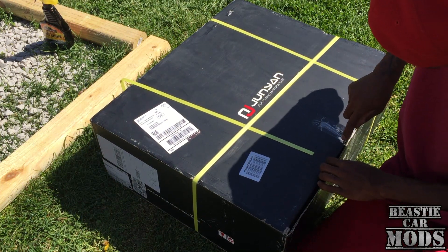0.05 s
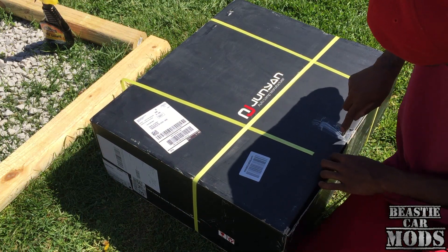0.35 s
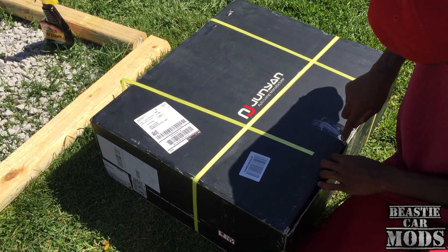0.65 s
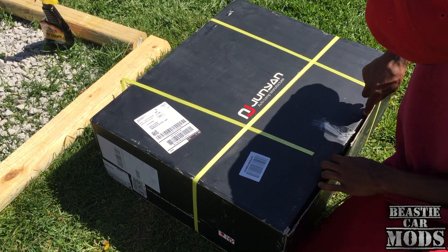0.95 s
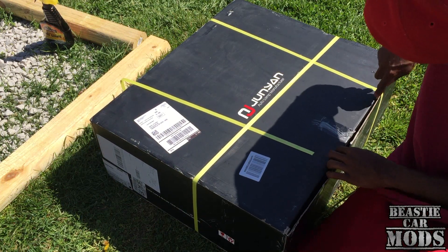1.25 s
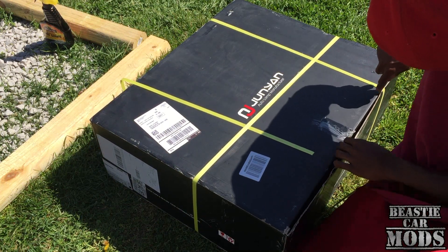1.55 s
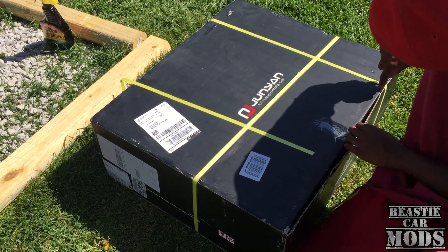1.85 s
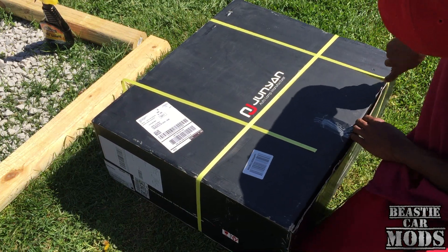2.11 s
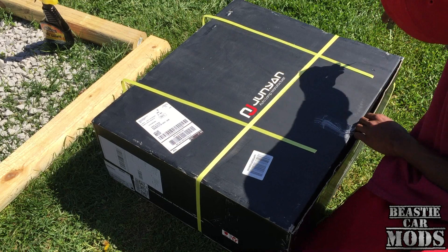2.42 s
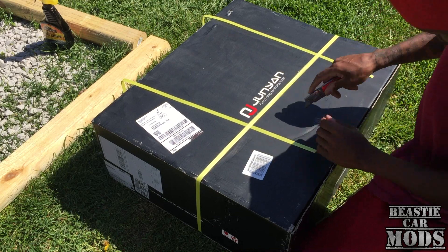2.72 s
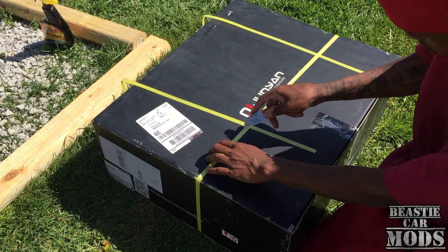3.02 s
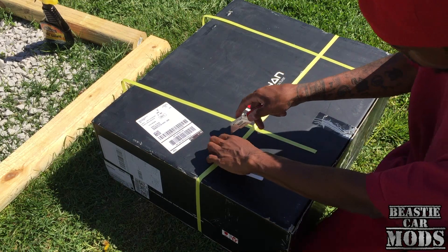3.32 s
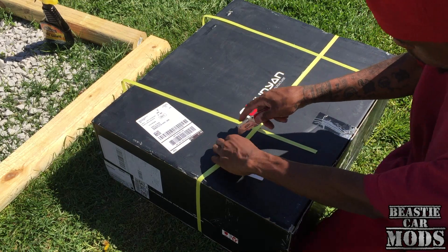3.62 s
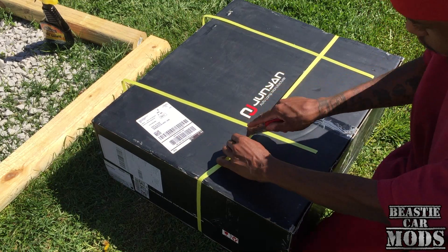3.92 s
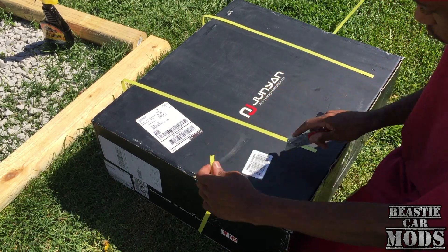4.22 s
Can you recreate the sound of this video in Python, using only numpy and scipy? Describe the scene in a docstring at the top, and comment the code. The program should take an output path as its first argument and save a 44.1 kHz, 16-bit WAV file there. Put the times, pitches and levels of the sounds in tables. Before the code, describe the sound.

Outdoors, a hand cutter scrapes and clicks lightly against a large cardboard box close to the microphone. A taut plastic strap cracks apart, thumps the hollow lid and slithers off, and a second follows about a second later. The steel jaws then tick shut with another crack, and a last strap snaps at the end. Light wind rumbles on the microphone while small birds whistle faintly over a distant rush.

```python
"""Taut plastic packing straps are cut off a big cardboard box on a lawn.
Light wind buffets the microphone over a far outdoor rush; small birds whistle and twitter throughout.
The cutter scrapes and clicks. Near 1.1 s and 2.3 s a strap cracks apart, thumps the hollow box,
then slithers and slaps over the lid. At 3.5 s the steel jaws tick shut with another crack.
The last strap gives way at 4.2 s."""
import sys
import numpy as np
from scipy import signal
from scipy.fft import rfft, irfft, next_fast_len
from scipy.io import wavfile
from scipy.ndimage import uniform_filter1d, map_coordinates

SR = 44100
rng = np.random.default_rng(int(sys.argv[2]) if len(sys.argv) > 2 else 0)


def transcribe(u):
    """Save the signal u as a 16-bit wav file named by the first command-line argument.

    u: samples, shape (n,) or (channels, n), limited to [-1, 1]; the rate is SR.
    q: integer samples, one column per channel.
    """
    v = np.clip(np.atleast_2d(u).T, -1, 1)
    q = np.round(v * 32767).astype(np.int16)
    wavfile.write(sys.argv[1], SR, q)


N = 187769
TIME = np.arange(N) / SR
HALF_SECOND = TIME[:SR // 2]


def amp(db):
    """Decibels to gain."""
    return 10 ** (np.asarray(db) / 20)


def unit(x):
    """x at rms 1."""
    return x / np.sqrt(np.mean(x ** 2) + 1e-20)


def burst(x):
    """x with the energy of 3 ms at rms 1."""
    return x * np.sqrt(.003 * SR / (np.sum(x ** 2) + 1e-20))


def fade(t, t60_s):
    """Exponential decay from t = 0."""
    return np.exp(-np.log(1000) * np.maximum(t, 0) / t60_s)


def at_hz(rows, hz):
    """Interpolate (Hz, value) rows on a log axis."""
    knots_hz, values = np.transpose(rows)
    return np.interp(np.log(hz + 1), np.log(knots_hz), values)


def curve(rows):
    """One value per sample from (s, value) rows."""
    return np.interp(TIME, *np.transpose(rows))


def wobble(rate_hz, size=N):
    """Smooth random curve, rate_hz knots a second."""
    knots = rng.standard_normal(int(size * rate_hz / SR) + 4)
    return map_coordinates(knots, [np.arange(size) * rate_hz / SR])


def add(track, start_s, x):
    """Mix x into the track."""
    start = max(round(start_s * SR), 0)
    track[start:start + len(x)] += x[:max(len(track) - start, 0)]


def coloured(x, spectrum):
    """x through a minimum-phase filter given as (Hz, dB) rows."""
    size = 2 * next_fast_len(len(x))
    gain = amp(at_hz(spectrum, np.fft.rfftfreq(size, 1 / SR)))
    cepstrum = irfft(np.log(gain))
    cepstrum[1:size // 2] *= 2
    cepstrum[size // 2 + 1:] = 0
    return irfft(rfft(x, size) * np.exp(rfft(cepstrum)))[:len(x)]


def low_cut(x, corner_hz):
    """Second-order high-pass."""
    return signal.sosfilt(signal.butter(2, corner_hz, "highpass", fs=SR, output="sos"), x)


# Each row: time in seconds, relative level in dB.
WIND_LEVELS = [(0, -57), (.3, -41.5), (.55, -47.5), (.73, -45.5), (1.05, -55.5), (1.4, -42), (1.63, -46.5),
               (1.8, -40), (1.85, -32), (1.91, -45), (2.04, -39.5), (2.25, -45), (2.85, -52.5),
               (3.55, -46.5), (3.9, -56), (4.25, -46)]
# Each row: frequency in Hz, relative level in dB.
WIND_SPECTRUM = [(18, -32), (30, -29), (42, 1), (60, -0.5), (80, 3), (120, -5.5), (165, -13.5),
                 (300, -33.5), (600, -72), (1500, -120)]

def wind(gain_db=1):
    """Light wind buffets the microphone with a low rumble."""
    rumble = unit(coloured(rng.standard_normal(N), WIND_SPECTRUM))
    return rumble * amp(curve(WIND_LEVELS) + gain_db)


# Each row: time in seconds, relative level in dB.
RUSH_LEVELS = [(0, -51.5), (.6, -53), (.8, -56.5), (2.3, -58.5), (2.7, -60.5), (4.25, -58)]
# Each row: frequency in Hz, relative level in dB.
RUSH_SPECTRUM = [(60, -23), (130, -5), (250, -4.5), (450, -11.5), (620, -11.5), (780, -8.5), (950, -8),
                 (1150, -13.5), (1500, -12), (2000, -17.5), (2800, -20.5), (4000, -27.5), (7000, -56)]

def far_rush(gain_db=2, patch_db=4):
    """Distant outdoor noise, drifting in patches of time and frequency."""
    bins = signal.stft(rng.standard_normal(N), nperseg=1024)[2]
    patches = uniform_filter1d(rng.standard_normal(bins.shape), size=4, axis=0)
    patches = uniform_filter1d(patches, size=7, axis=1)
    noise = signal.istft(bins * amp(patch_db * unit(patches)), nperseg=1024)[1][:N]
    return unit(coloured(noise, RUSH_SPECTRUM)) * amp(curve(RUSH_LEVELS) + gain_db)


# Each row: peak time in seconds, width in seconds, level in dB.
DRONE_SWELLS = [(.4, 1, -58.5), (2.6, 0.039, -59), (3.08, 0.069, -55)]

def far_drone(centre_hz=950, width_hz=90):
    """A hollow tone of narrow-band noise swells out of the rush."""
    phase = 2 * np.pi * centre_hz * TIME
    band = wobble(2 * width_hz) * np.sin(phase) + wobble(2 * width_hz) * np.cos(phase)
    swells = sum(amp(db) * np.exp(-((TIME - peak_s) / width_s) ** 2)
                 for peak_s, width_s, db in DRONE_SWELLS)
    return unit(band) * swells


# Each row: frequency in Hz, relative level in dB.
HISS_SPECTRUM = [(300, -21), (3000, 1), (6000, -3), (9000, -6.5), (10300, -10.5), (12000, -9),
                 (16000, -12.5)]

def hiss(level_db=-73):
    """Faint, steady hiss."""
    return amp(level_db) * unit(coloured(rng.standard_normal(N), HISS_SPECTRUM))


def bird_note(length_s, end_hz, fall_hz, shake_hz, shake_rate_hz):
    """A shaking tone that slides by fall_hz and levels out."""
    size = int(length_s * SR)
    slide_hz = fall_hz * np.linspace(1, 0, size) ** 2.1
    pitch_hz = end_hz + slide_hz + shake_hz * wobble(shake_rate_hz, size)
    return signal.windows.tukey(size, .5) * np.sin(2 * np.pi * np.cumsum(pitch_hz) / SR)


# Each row: start in seconds, length in seconds, end pitch in Hz, fall to it in Hz, level in dB.
WHISTLE_NOTES = [(0, 0.039, 2850, 754, -45.5), (0.044, 0.038, 2853, 208, -51.5),
                 (0.485, .099, 2430, 440, -58), (1.336, .084, 2970, 71, -57),
                 (2.184, 0.0415, 2990, 248, -59), (2.242, 0.034, 2750, 326, -56.5),
                 (2.81, 0.056, 2800, 343, -60.5), (2.963, 0.0383, 2740, 330, -61.5),
                 (3.817, 0.096, 2588, -53, -62), (3.979, .035, 2927, 322, -55)]

def whistles():
    """One bird whistles short, mostly falling notes."""
    out = np.zeros(N)
    for start_s, length_s, end_hz, fall_hz, db in WHISTLE_NOTES:
        note = bird_note(length_s, end_hz, fall_hz, shake_hz=45.5, shake_rate_hz=600)
        add(out, start_s, amp(db) * note)
    return out


# Each row: resonance in Hz, bandwidth in Hz, gain in dB.
PANEL_MODES = [(268, 54, -4), (368, 61, 6), (539.5, 36, -3), (654, 68, 3.5), (888, 285, 0.5),
               (1383, 105, -7.5), (1544, 71, 1.5), (1767, 184, 3.5), (2085, 50, 1.5), (2462, 114, -0.5)]

def cardboard(force, pitch_ratio=1, corner_hz=2400):
    """Yielding panels take in little treble and ring at a pitch set by where they are struck."""
    push = signal.sosfilt(signal.butter(2, corner_hz, fs=SR, output="sos"), force)
    size = 2 * next_fast_len(len(force))
    hz = np.fft.rfftfreq(size, 1 / SR) / pitch_ratio
    response = sum(amp(db) * 1j * hz * width_hz / (mode_hz ** 2 - hz ** 2 + 1j * hz * width_hz)
                   for mode_hz, width_hz, db in PANEL_MODES)
    return irfft(rfft(push, size) * response)[:len(force)]


# The strap's rasp and sharp edge. Each row: frequency in Hz, relative level in dB.
RASP_SPECTRUM = [(300, -16), (1200, -4), (2200, 1.5), (3200, 4.5), (4500, -3), (5600, -14.5), (7500, -14.5),
                 (12000, -40)]
EDGE_SPECTRUM = [(3000, -36.5), (6000, 6.5), (8500, 2.5), (10300, -8), (11800, -8), (16000, -21.5)]

def friction(strokes, grain_db=3, grain_rate_hz=900, clump_db=2.8, clump_rate_hz=110):
    """Embossed plastic catches and slips on cardboard in clumps of tiny grains."""
    powers = np.zeros((3, N))
    for peak_s, rise_s, t60_s, *levels_db in strokes:
        start_s = max(peak_s - .15, 0)
        t = HALF_SECOND + start_s - peak_s
        envelope = np.exp(np.minimum(t, 0) * 2 / rise_s) * fade(t, t60_s)
        for power, db in zip(powers, levels_db):
            add(power, start_s, (amp(db) * envelope) ** 2)
    rasp_gain, edge_gain, board_gain = np.sqrt(powers)
    slips = rng.standard_normal(N)
    slips *= amp(grain_db * wobble(grain_rate_hz) + clump_db * wobble(clump_rate_hz))
    rasp = rasp_gain * unit(coloured(slips, RASP_SPECTRUM))
    edge = edge_gain * unit(coloured(slips, EDGE_SPECTRUM))
    return rasp + edge + board_gain * unit(cardboard(slips))


# Each row: peak time, rise and t60 in seconds, then rasp, edge and cardboard levels in dB.
SCRAPE_STROKES = [(.096, 0.0044, 0.082, -37.5, -54.5, -46), (.833, 0.01, 0.071, -50.5, -72, -56),
                  (1.166, .045, 0.17, -40.5, -61, -41), (1.244, 0.13, 0.66, -54, -74, -59.5),
                  (1.604, 0.027, .12, -41.5, -62.5, -51), (1.785, 0.11, 0.56, -55.5, -70, -70),
                  (1.925, .04, .1, -45, -69, -54), (2.038, .062, 0.23, -50, -70, -50.5),
                  (2.178, 0.059, 0.5, -48.5, -78, -49.5), (2.412, 0.0077, .035, -37, -60, -43),
                  (2.49, 0.1, .36, -56.5, -70, -67), (2.78, 0.078, 0.16, -49.5, -63.5, -56.5),
                  (3.262, 0.019, 0.083, -41.5, -70, -37), (3.28, .13, 0.34, -46.5, -67, -50.5),
                  (3.52, 0.077, 0.65, -48, -66, -53.5), (3.565, 0.015, .048, -40, -72, -39),
                  (3.836, 0.014, 0.13, -56, -69, -54), (4.079, 0.01, .093, -43, -52, -47.5),
                  (4.255, 0.028, .1, -38.5, -49, -44)]

def scrapes():
    """Blade, hand and plastic rub over the box."""
    return friction(SCRAPE_STROKES)


def fracture(t60_s, clean_t60_s=0.015, flutter_db=-12, flutter_t60_s=0.035):
    """Force of a snap: sharp release, splintering fibres (longer is more ragged), strap flutter."""
    t = TIME[:SR // 12]
    splinters = burst(rng.standard_normal(len(t)) * fade(t, t60_s))
    release = burst(1. * (t == 0)) * clean_t60_s / t60_s
    flutter = burst(rng.standard_normal(len(t)) * fade(t, flutter_t60_s))
    return burst(release + splinters) + amp(flutter_db) * flutter


# Each row: frequency in Hz, relative level in dB.
CRACK_SPECTRUM = [(300, -64), (1000, -7), (1650, -15.5), (1950, -12), (2300, -6.5), (2900, 1.5),
                  (3600, -2.5), (4500, -6), (5400, -18), (6300, -15.5), (7500, -19), (12000, -44)]

def snap(crack_db, t60_s, edge_db, knock_db, pitch_ratio, low_cut_hz):
    """Plastic cracks and knocks on the cardboard, with less bass where the lid is held stiff."""
    force = fracture(t60_s)
    crack = amp(crack_db) * burst(coloured(force, CRACK_SPECTRUM))
    edge = amp(edge_db) * burst(coloured(force, EDGE_SPECTRUM))
    knock = amp(knock_db) * burst(cardboard(low_cut(force, low_cut_hz), pitch_ratio))
    return crack + edge + knock


def tap(click_db, knock_db, t60_s):
    """A light touch on strap and box makes a small snap."""
    edge_db = click_db - 19.5
    return snap(click_db, t60_s, edge_db, knock_db, pitch_ratio=.84, low_cut_hz=150)


# Each row: start in seconds, click level in dB, cardboard knock level in dB.
CUTTER_CLICKS = [(0.4926, -37, -40), (0.8842, -49.5, -64), (2.0985, -49, -64), (2.7955, -43, -56),
                 (3.5595, -45, -49), (3.667, -41, -38.5), (3.6847, -35, -32.5), (4.034, -46.5, -57),
                 (4.052, -44, -54), (4.161, -43, -61)]

def cutter_clicks():
    """The cutter bumps against strap and box."""
    out = np.zeros(N)
    for start_s, click_db, knock_db in CUTTER_CLICKS:
        add(out, start_s, tap(click_db, knock_db, t60_s=0.0091))
    return out


# Each row: start in seconds, length in seconds, pitch in Hz, level in dB.
TWITTER_NOTES = [(0.589, 0.061, 4670, -58.5), (0.755, .11, 3600, -59), (1.503, 0.084, 4170, -58),
                 (1.642, 0.17, 3930, -57.5), (2.003, .14, 3640, -54.5), (2.216, .05, 3550, -57),
                 (2.513, 0.062, 3515, -58), (2.647, 0.15, 3940, -60), (3.863, 0.093, 4400, -57)]

def twitters():
    """A second bird sings higher, its widely shaking pitch making a buzz."""
    out = np.zeros(N)
    for start_s, length_s, hz, db in TWITTER_NOTES:
        note = bird_note(length_s, hz, fall_hz=0, shake_hz=373, shake_rate_hz=350)
        add(out, start_s, amp(db) * note)
    return out


# Each row: start in seconds, crack level in dB, t60 in seconds, edge level in dB,
# knock level in dB, panel pitch ratio, knock low cut in Hz.
STRAP_CRACKS = [(1.0487, -15.5, 0.0022, -27.5, -27, 1, 500), (1.0501, -21.5, 0.0063, -45, -25, 0.62, 348),
                (1.0696, -28, .005, -50, -48, 1, 200), (1.078, -16.5, 0.0055, -36.5, -23, .75, 120),
                (2.3368, -12.5, 0.0087, -47, -18, 0.96, 700), (2.339, -28, 0.015, -55, -16, 0.96, 300),
                (3.4667, -16.5, 0.01, -32, -24, 0.85, 120), (4.1765, -28, 0.036, -35.5, -39, 0.43, 600),
                (4.183, -14.5, 0.01, -45, -12.5, 0.95, 595), (4.193, -22, 0.029, -44, -39, 0.75, 600)]

def strap_cracks():
    """Taut straps crack apart under the blade or whip down on the box."""
    out = np.zeros(N)
    for start_s, *settings in STRAP_CRACKS:
        add(out, start_s, snap(*settings))
    return out


# Each row: frequency in Hz, gain in dB, t60 in seconds.
BOX_MODES = [(94.2, -13, 0.16), (145.9, 2, 0.063), (261.3, -6.5, 0.055), (400.4, -18, 0.062)]
# Each row: start in seconds, relative level in dB, pitch ratio, t60 ratio, tilt in dB per octave.
BOX_BLOWS = [(1.053, -32, 1.1, 1.1, 6), (1.074, -26.5, 1.72, 3, 1.5), (1.082, -29, 1, 3.2, 6),
             (1.156, -35, 1.3, 5, -3), (2.339, -13, 1.09, 0.78, 2), (3.528, -34, .62, 2, -8),
             (3.561, -34, 2.1, 0.87, -5), (4.188, -20, .8, 1.1, -7)]

def box_thumps(attack_s=0.00049, waver_rad=0.91, waver_rate_hz=133):
    """The lid bounces unevenly on the air inside the box, higher when struck near a stiff edge."""
    out = np.zeros(N)
    t = HALF_SECOND
    main_hz = BOX_MODES[1][0]
    attack = 1 - np.exp(-t / attack_s)
    for start_s, db, pitch_ratio, t60_ratio, tilt_db in BOX_BLOWS:
        for hz, mode_db, t60_s in BOX_MODES:
            waver = waver_rad * wobble(waver_rate_hz, len(t))
            swing = np.sin(2 * np.pi * hz * pitch_ratio * t + waver)
            gain = amp(db + mode_db + tilt_db * np.log2(hz / main_hz))
            add(out, start_s, gain * swing * attack * fade(t, t60_s * t60_ratio))
    return out


# Each row: time in seconds, tear level in dB, tear rise in seconds, slither level in dB,
# slither t60 in seconds.
STRAP_RELEASES = [(1.066, -23, 0.01, -38.5, 0.41), (2.336, -22, 0.01, -39.5, 0.13),
                  (4.181, -21, 0.0089, -47, 0.41)]
SLITHER_DELAY_S = .02

def tears_and_slithers(tear_t60_s=0.064, slither_rise_s=0.013):
    """Each strap tears through, then its loose end slides off the box."""
    strokes = []
    for tear_s, tear_db, tear_rise_s, slither_db, slither_t60_s in STRAP_RELEASES:
        tear_levels_db = tear_db, tear_db - 15, tear_db - 6  # rasp, edge, cardboard
        slither_levels_db = slither_db, slither_db - 20, slither_db - 1.5
        strokes.append((tear_s, tear_rise_s, tear_t60_s, *tear_levels_db))
        strokes.append((tear_s + SLITHER_DELAY_S, slither_rise_s, slither_t60_s, *slither_levels_db))
    return friction(strokes)


def strap_slaps(count=6, gap_s=.014, gain_db=-6, scatter_db=5):
    """The freed end pats the lid at uneven gaps, weakening as the slither dies."""
    out = np.zeros(N)
    for tear_s, _, _, slither_db, slither_t60_s in STRAP_RELEASES:
        for k, (jitter, strength) in enumerate(rng.uniform(-1.1, 1, (count, 2))):
            after_s = gap_s * (k + .5 + jitter / 2)
            db = slither_db + gain_db + scatter_db * strength
            pat = tap(db, knock_db=db + 10.5, t60_s=0.0055)
            add(out, tear_s + SLITHER_DELAY_S + after_s, fade(after_s, slither_t60_s) * pat)
    return out


# Each row: start in seconds, level in dB, t60 in seconds.
JAW_TICKS = [(3.4663, -27, 0.0026), (3.5582, -49.5, 0.014)]
# Each row: frequency in Hz, relative level in dB.
STEEL_SPECTRUM = [(4000, -63), (6000, -15), (7200, -5), (9000, -8.5), (10500, -24), (13000, -33),
                  (16000, -41)]

def cutter_jaws():
    """Steel jaws tick as they shut and open."""
    out = np.zeros(N)
    for start_s, db, t60_s in JAW_TICKS:
        add(out, start_s, amp(db) * burst(coloured(fracture(t60_s), STEEL_SPECTRUM)))
    return out


# Each row: frequency in Hz, t60 in seconds.
YARD_DECAY = [(200, 0.39), (1000, 0.5), (4000, 0.24), (10000, 0.15)]

def yard_scatter(x):
    """Thin reflections from ground, walls and trees; the treble dies first."""
    hz, t, bins = signal.stft(rng.standard_normal(SR // 2), SR, nperseg=256)
    decay = fade(t, at_hz(YARD_DECAY, hz)[:, None])
    tail = signal.istft(bins * decay, SR, nperseg=256)[1]
    return signal.fftconvolve(x, tail / np.linalg.norm(tail))[:N]


def scene():
    """Mono mix: the box near and almost dry, the birds with much scatter."""
    outdoors = wind() + far_rush() + far_drone() + hiss()
    birds = whistles() + twitters()
    box = scrapes() + cutter_clicks() + strap_cracks() + box_thumps()
    box += tears_and_slithers() + strap_slaps() + cutter_jaws()
    scatter = amp(-0.5) * yard_scatter(birds) + amp(-18.5) * yard_scatter(box)
    return (outdoors + birds + box + scatter)[None]


def record(dry, low_cut_hz=38, ceiling=0.8, top_hz=16000):
    """The microphone sheds deep bass, squashes the loudest snaps and keeps nothing above top_hz."""
    x = low_cut(dry, low_cut_hz)
    squashed = x / (1 + np.abs(x / ceiling) ** 4) ** (1 / 4)
    size = next_fast_len(N + SR // 2)
    passband = np.fft.rfftfreq(size, 1 / SR) < top_hz
    return irfft(rfft(squashed, size) * passband, size)[..., :N]


dry = scene()
out = record(dry)
transcribe(out)
```